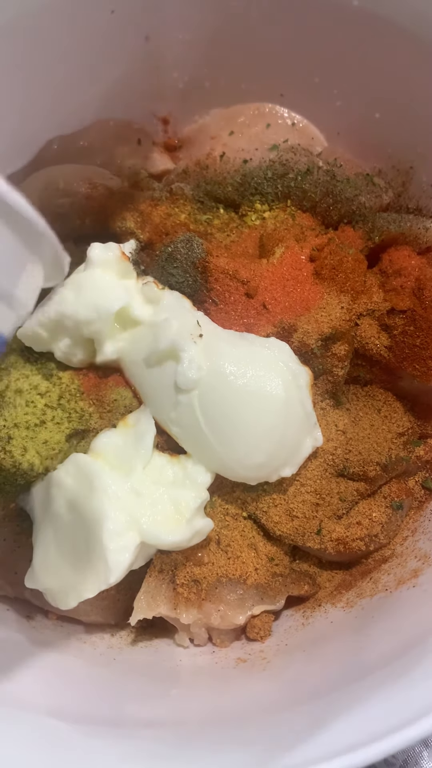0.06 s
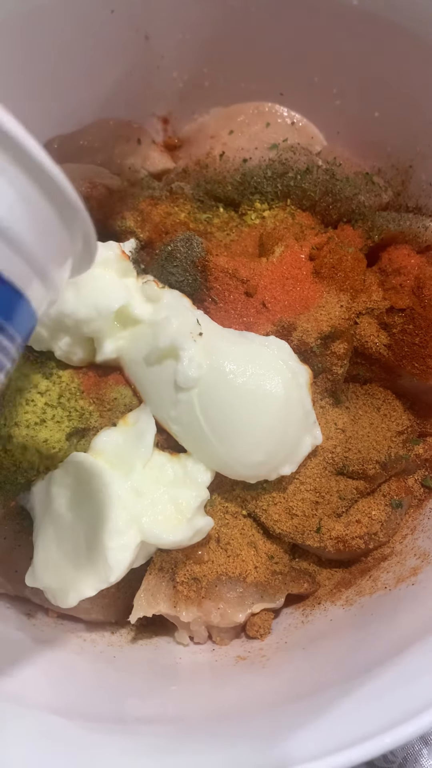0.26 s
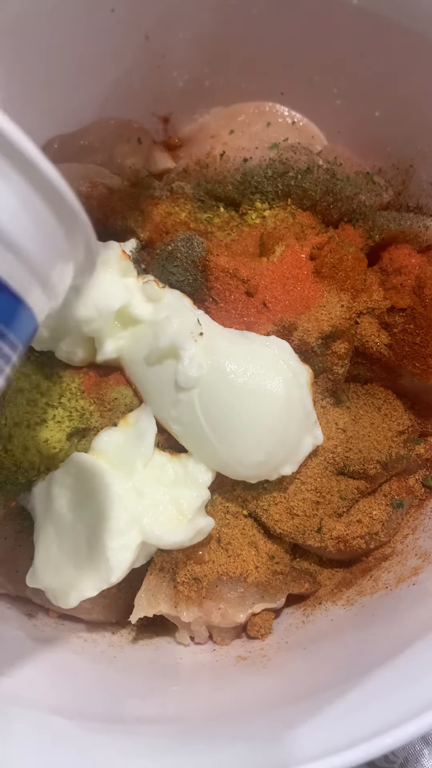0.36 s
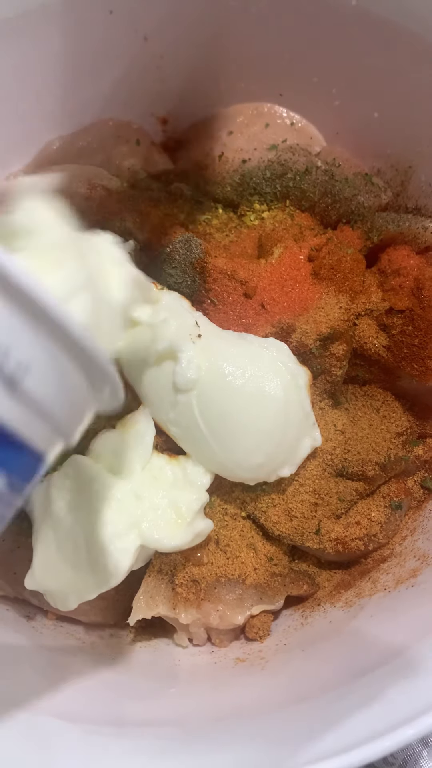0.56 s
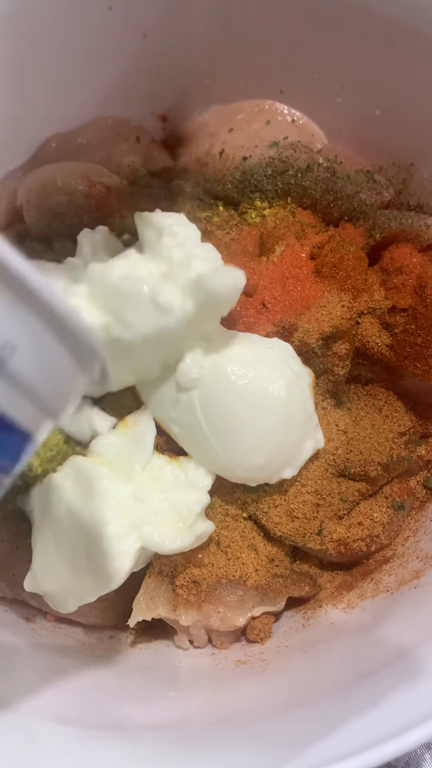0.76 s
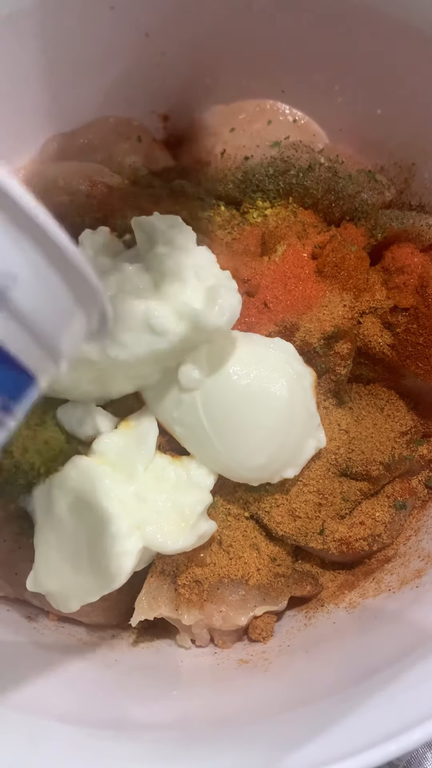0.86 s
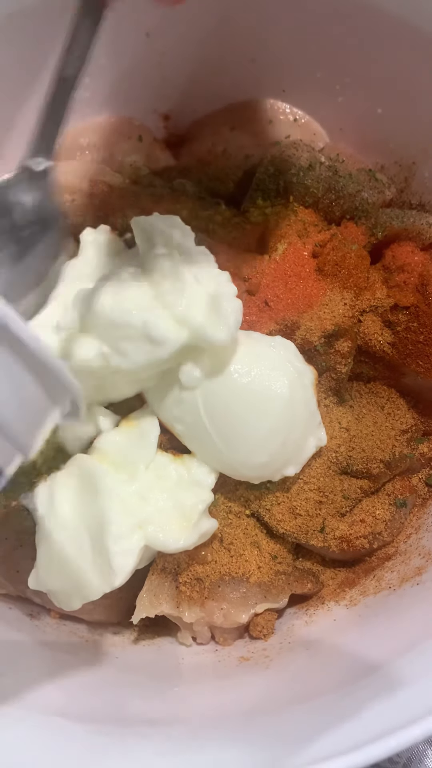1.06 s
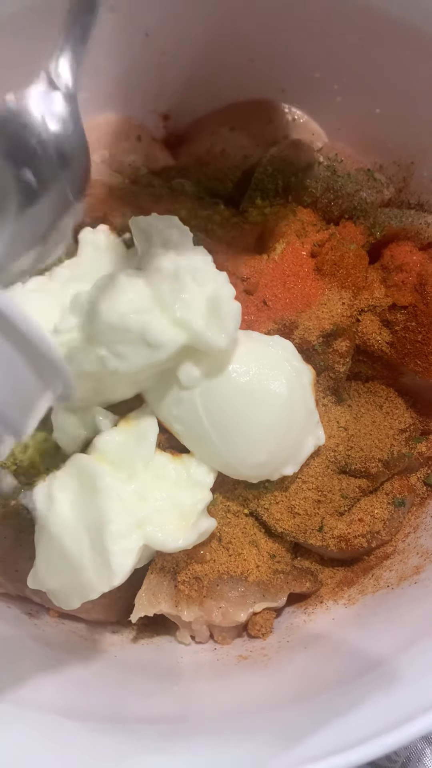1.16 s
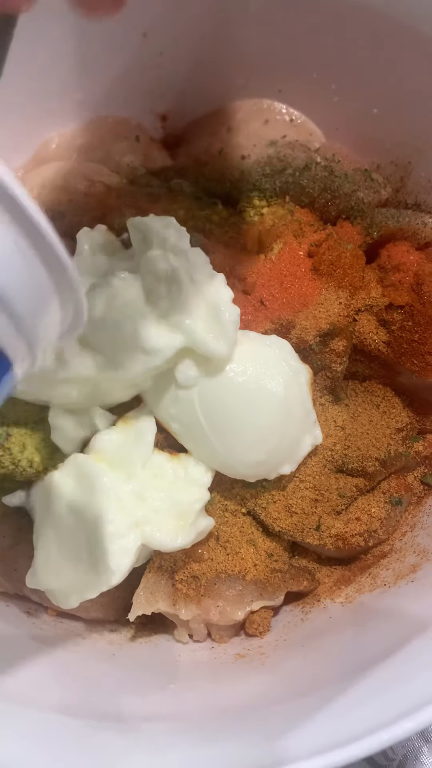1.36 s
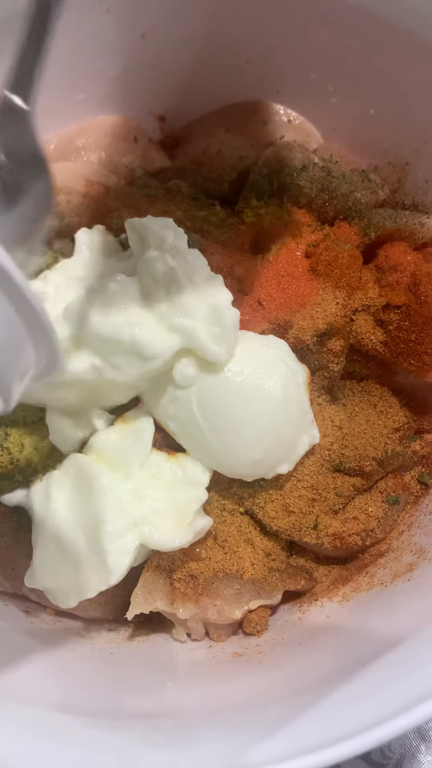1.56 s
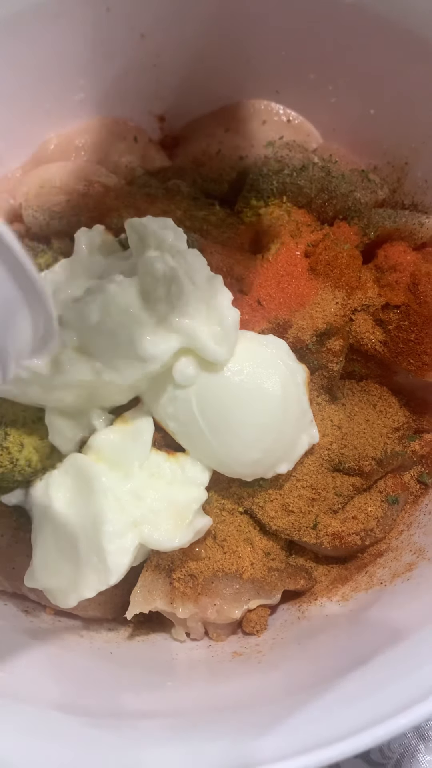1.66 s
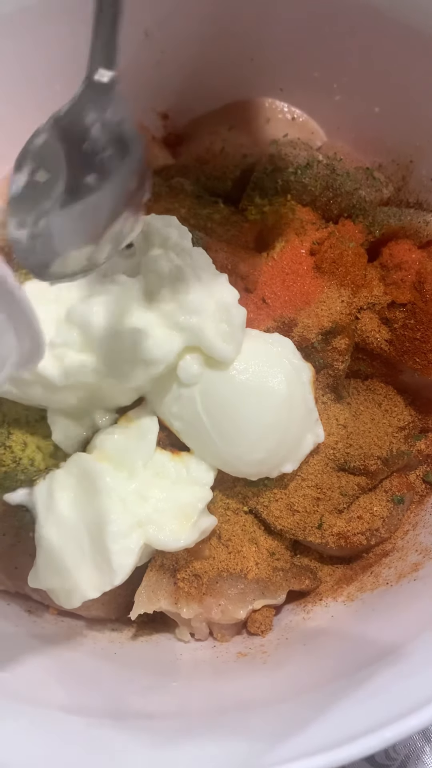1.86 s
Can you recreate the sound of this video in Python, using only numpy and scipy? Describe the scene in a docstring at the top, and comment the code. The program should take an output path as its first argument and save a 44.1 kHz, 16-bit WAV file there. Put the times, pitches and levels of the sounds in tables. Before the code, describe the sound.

Metal spoon knocks sharply on a plastic yogurt tub, with wet smears and short scrapes, close up

```python
"""A metal spoon digs yogurt from a plastic tub and knocks it off over a bowl, close to the microphone.
Each knock is a burst of noise plus fading tones for the tub's wall, its air and its body; some add a low thump.
Between knocks, gritty noise makes the scrapes and smears, and short noise bursts make wet ticks.
A small kitchen answers with a fading noise tail and one echo, over a faint rumble and a thin high whine."""
import sys
import numpy as np
from scipy import signal
from scipy.fft import rfft, irfft
from scipy.io import wavfile

SR = 44100
rng = np.random.default_rng(int(sys.argv[2]) if len(sys.argv) > 2 else 0)


def digitize_waveform(pressure):
    """Quantize a signal to 16-bit integers and store it at the path in sys.argv[1].

    Rows of a 2-D input are taken as channels; values are limited to [-1, 1].
    """
    field = np.atleast_2d(pressure).T
    bounded = np.clip(field, -1, 1)
    quanta = np.round(bounded * 32767).astype(np.int16)
    wavfile.write(sys.argv[1], SR, quanta)


N = 85995  # length in samples

# firm knocks of spoon on tub: start_s, crack_db, wall_db, wall_pitch_hz, hollow_db, body_db, body_pitch_hz,
# clinks (a list of pitch_hz, level_db)
KNOCKS = [(0.226, -26.5, -24, 913, -21, -25, 548, [(1120, -30), (2430, -30.5)]),
          (0.5065, -10.5, -25, 960, -17.5, -11, 506, [(2290, -9.5), (3030, -18), (4040, -14),
          (7640, -9.5)]), (0.8146, -16.5, -25, 963, -40.5, -26, 370, [(2250, -24.5), (3700, -22),
          (5400, -18.5)]), (0.939, -15, -19, 1007, -37, -13.5, 455, [(2050, -27.5), (3670, -13)]),
          (1.2749, -14, -19, 1070, -44, -12, 378, [(3450, -28), (5880, -12), (6900, -18.5)]),
          (1.3540, -14.5, -16, 1274, -25, -14, 797, [(1000, -14.5), (1800, -19), (2220, -23),
          (5150, -10.5)]), (1.6370, -11.5, -11.5, 1049, -20, -9, 396, [(2380, -19.5), (3680, -16.5),
          (5850, -15.5)])]
# light grazes and bounces: start_s, crack_db, wall_db, wall_pitch_hz, hollow_db
BOUNCES = [(.5038, -22, -20, 1008, -55.5), (1.2887, -32, -41.5, 1080, -33),
           (1.3615, -26.5, -23.5, 1000, -47), (1.3743, -24, -19.5, 1063, -39),
           (1.3788, -49, -22.5, 1186, -40), (1.6672, -26.5, -22, 1013, -41.5),
           (1.6750, -23.5, -17, 1151, -24)]
# tones of the tub's wall: multiple_of_wall_pitch, level_db, t60_s (time to fade by 60 dB)
WALL_TONES = [(1, 0.5, 0.027), (1.37, -12, 0.048), (2.05, -7.5, 0.018), (2.35, -12, 0.03),
              (3.6, -13.5, 0.028), (5.8, -17.5, 0.021)]
# tone colour of the cracks: pitch_hz, level_db
CRACK_COLOUR = [(100, -13.5), (400, 3.5), (780, 10), (1100, -2.5), (1700, -5.5), (2400, -2.5), (4000, 1.5),
                (6000, 0.5), (8000, -5.5), (12000, -6), (16000, -21)]
# narrow treble peaks of spoon and tub: pitch_hz
RIDGES_HZ = [1920, 2300, 2950, 3350, 3900, 6050, 6660, 7640]
# the spoon sticks and slips along the wall: start_s, level_db
SLIPS = [(.9655, -12.5), (.9676, -16), (.9695, -15), (.9724, -15.5), (.9777, -13.5)]
# soft low pushes as the tub jolts and yogurt lands: start_s, level_db, final_pitch_hz
THUMPS = [(0.23, -22, 74.8), (0.508, -32, 90.7), (0.817, -20, 60.2), (1.278, -29, 90.4), (1.354, -21, 64.7),
          (1.644, -27.5, 72.1)]
# spoon dragged along the tub: start_s, end_s, start_level_db, end_level_db
SCRAPES = [(0.48, 0.508, -50, -55), (0.734, 0.84, -47.5, -52.5), (0.928, 0.975, -40, -37),
           (0.992, 1.086, -41, -59), (1.075, 1.23, -59.5, -74.5)]
# tone colour of the scrapes: pitch_hz, level_db
SCRAPE_COLOUR = [(40, -28), (190, -9), (450, -10), (720, -11), (950, -2.5), (1080, -10), (1270, -1),
                 (1700, -14), (3200, -20), (3900, -9), (5600, -14.5), (8500, -31.5), (10700, -23.5),
                 (14000, -44.5)]
# wavering ring of spoon and bowl under a scrape: pitch_hz, level_db
SINGING_TONES = [(345, -10), (468, -8), (540, -10), (721, -12), (945, 0), (1135, -6), (1215, -7),
                 (1292, -2), (1389, -13), (3850, -14)]
# yogurt smearing on plastic: start_s, end_s, start_level_db, end_level_db, tilt_db_per_octave
SMEARS = [(0.233, 0.308, -49.5, -52, -4.5), (0.302, 0.379, -45.5, -37, -3), (0.382, 0.432, -39.5, -27.5, 0),
          (0.435, 0.523, -49, -49, 0.5), (0.661, 0.715, -63, -65.5, -7), (0.829, 0.955, -47, -48, 10),
          (0.943, 0.991, -27.5, -36, -3.5), (1.189, 1.243, -56, -56, 2.5), (1.257, 1.358, -51, -50.5, -2),
          (1.937, 1.969, -70, -68, -6)]
# tone colour of the smears before their tilt: pitch_hz, level_db
SMEAR_COLOUR = [(30, -34), (220, -36), (420, -14), (650, -5), (900, -12), (1400, -5), (2000, -3), (3000, 0),
                (5500, 5), (8000, -2), (11000, -5), (15500, -23)]
# tiny wet ticks: start_s, level_db, pitch_hz
TICKS = [(0.559, -35.5, 13600), (1.5611, -49.5, 10100), (1.731, -46.5, 10100)]
# how long the kitchen's tail takes to fade by 60 dB: pitch_hz, t60_s
ROOM_T60 = [(100, 0.2), (300, 0.58), (600, 0.36), (1200, 0.3), (3000, 0.21), (7000, 0.15), (15000, 0.14)]
# loudness of the kitchen's tail: pitch_hz, level_db
ROOM_LEVEL = [(80, -17), (300, -11.5), (650, -14.5), (1200, -16), (3000, -16), (7000, -25.5),
              (15000, -23.5)]
# how much room and rumble differ between the ears: pitch_hz, side_gain
ROOM_WIDTH = [(50, .22), (150, 0.6), (400, 0.85), (1500, 0.91), (8000, 0.38)]
# tone colour of the room's rumble: pitch_hz, level_db
RUMBLE_COLOUR = [(20, -24), (45, -2), (80, 0), (150, -4), (280, -13), (450, -19), (700, -24), (1200, -28),
                 (3000, -31), (8000, -38), (15000, -43)]
# path of the faint high whine: time_s, pitch_hz, level_db
WHINE_PATH = [(0, 15300, -68), (.14, 14100, -68), (.21, 15000, -72), (.6, 15600, -85.5),
              (.87, 14600, -66.5), (1.1, 15800, -71), (1.27, 14300, -65.5), (1.448, 15270, -100)]
# timing between the two microphone ports: pitch_hz, left_lead_radians
PORT_PHASE = [(0, 0), (200, -.2), (700, -.6), (1600, -.45), (2000, .2), (2400, 2.3), (3100, 1.2),
              (4000, 1.9), (4750, 3.2), (6700, 6.2), (8900, 9.4), (11200, 12.6), (13200, 15.7),
              (15000, 18.6), (22000, 18.85)]
# loudness between the two ports: pitch_hz, left_minus_right_db
PORT_BALANCE = [(60, -3.5), (110, 2.5), (200, -5.5), (380, 2), (700, -6.5), (1290, 0), (2380, -1.5),
                (3800, 0), (4750, 3.5), (8120, -1.5), (15000, .5)]

T = np.arange(SR // 4) / SR  # clock for one short sound, s
CLOCK = np.arange(N) / SR  # clock for the whole scene, s
HZ = np.fft.rfftfreq(2 * N, 1 / SR)  # pitches at which filters are drawn

# knocks
CRACK_T60, CRACK_RISE_S = 0.019, 0.00023
RATTLE_DB, RATTLE_T60 = -25.5, 0.2
CLINK_T60 = 0.017
BODY_T60, BODY_RISE_S = 0.027, 0.0023
RIDGE_WIDTH_HZ, RIDGE_DB = 70, 7
HOLLOW_HZ, HOLLOW_T60, HOLLOW_RISE_S = 647, .075, .0022
HOLLOW_PAIR_HZ, HOLLOW_PAIR_DB, HOLLOW_PAIR_T60 = 662, -17, .18
FLUTTER_DEPTH, FLUTTER_HZ = .25, 70
# slips: levels are added to each slip's own level; damping divides the wall's fading times
SLIP_WALL_HZ, SLIP_WALL_DB, SLIP_DAMPING = 1010, 4.5, 3.36
SLIP_CRACK_DB, SLIP_BODY_DB, SLIP_BODY_HZ = -10.5, -11, 587
# thumps: the extra pitch is added at the start and dies away
THUMP_T60, THUMP_RISE_S = 0.083, 0.0084
THUMP_EXTRA_HZ, THUMP_SAG_S = 203, 0.0056
# friction: grains are random spikes, and the fade is the level change over one slip
STROKE_EDGE_S, GRAINS_PER_S, GRAIN_SHARE = 0.017, 900, .2
STICK_HZ, STICK_JITTER, STICK_FADE_DB = 210, .5, -8
SING_DB, SING_T60, SING_WAVER_HZ = -1.5, .52, 12
TICK_T60, TICK_WIDTH_OCT = 0.015, 0.27
# room and background
ROOM_DELAY_S = 0.0048  # middle of the tail's fade-in
ECHO_S, ECHO_DB, ECHO_HZ, ECHO_WIDTH_OCT = 0.059, -23.5, 620, 0.43
RUMBLE_DB, WHINE_WIDTH_HZ = -61, 300
LOW_CUT_HZ, HIGH_CUT_HZ = 22, 16300


def spoon():
    """Knocks, bounces and slips crack and ring the tub; the point of contact sets the pitches."""
    cracks, rings = np.zeros((2, N))
    for s, crack_db, wall_db, wall_hz, hollow_db, *_ in KNOCKS + BOUNCES:
        add(cracks, s, amp(crack_db) * crack())
        add(rings, s, amp(wall_db) * wall(wall_hz) + amp(hollow_db) * hollow())
    for s, *_, body_db, body_hz, clinks in KNOCKS:
        add(rings, s, amp(body_db) * ring(body_hz, BODY_T60, BODY_RISE_S))
        for hz, db in clinks:
            add(rings, s, amp(db) * ring(hz, CLINK_T60, CRACK_RISE_S))
    for s, db in SLIPS:
        add(cracks, s, amp(db + SLIP_CRACK_DB) * crack())
        add(rings, s, amp(db + SLIP_WALL_DB) * wall(SLIP_WALL_HZ, SLIP_DAMPING))
        add(rings, s, amp(db + SLIP_BODY_DB) * ring(SLIP_BODY_HZ, BODY_T60, BODY_RISE_S))
    return rings + colour(cracks, read(CRACK_COLOUR, HZ) + ridges())


def crack():
    """A few milliseconds of crowded high tones, made from noise, then a weak rattle."""
    noise = unit(np.tanh(2 * rng.standard_normal(len(T))))
    rattle = amp(RATTLE_DB) * dying(RATTLE_T60, CRACK_RISE_S)
    return noise * (dying(CRACK_T60, CRACK_RISE_S) + rattle)


def wall(hz, damping=1):
    """The plastic wall bends in several ways at once, each a fading tone."""
    return sum(amp(db) * ring(hz * ratio, t60 / damping, CRACK_RISE_S) for ratio, db, t60 in WALL_TONES)


def hollow():
    """Air in the tub: two close tones that beat and flutter as they die."""
    first = ring(HOLLOW_HZ, HOLLOW_T60, HOLLOW_RISE_S)
    second = amp(HOLLOW_PAIR_DB) * ring(HOLLOW_PAIR_HZ, HOLLOW_PAIR_T60, HOLLOW_RISE_S)
    flutter = slow_noise(FLUTTER_HZ)[:len(T)]
    return (first + second) * (1 + FLUTTER_DEPTH * flutter)


def ridges():
    """Narrow treble peaks of spoon and tub, as dB over HZ."""
    return RIDGE_DB * sum(1 / (1 + ((HZ - hz) / RIDGE_WIDTH_HZ) ** 2) for hz in RIDGES_HZ)


def thumps():
    """Low pushes whose pitch sags as they die."""
    out = np.zeros(N)
    for s, db, final_hz in THUMPS:
        pitch = final_hz + THUMP_EXTRA_HZ * np.exp(-T / THUMP_SAG_S)
        add(out, s, amp(db) * dying(THUMP_T60, THUMP_RISE_S) * glide(pitch))
    return out


def friction():
    """Bright smears of yogurt, and hollow scrapes that leave spoon and bowl ringing."""
    smears = np.zeros(N)
    for *row, tilt in SMEARS:
        curve = read(SMEAR_COLOUR, HZ) + ridges() + tilt * np.log2(HZ + 20)
        smears += colour(stroke(*row), curve)
    drag = sum(stroke(*row) for row in SCRAPES)
    return smears + colour(drag, read(SCRAPE_COLOUR, HZ)) + singing(drag)


def stroke(start, end, from_db, to_db):
    """The spoon sticks and lets go unevenly; each slip is a fading spray of grains and hiss."""
    grains = unit(rng.standard_normal(N) * (rng.random(N) < GRAINS_PER_S / SR))
    hiss = rng.standard_normal(N)
    spray = np.sqrt(GRAIN_SHARE) * grains + np.sqrt(1 - GRAIN_SHARE) * hiss
    slip_rate = STICK_HZ * np.exp(STICK_JITTER * slow_noise(STICK_HZ))
    since_slip = np.cumsum(slip_rate) / SR % 1  # 0 to 1 within each slip
    gate = np.clip(np.minimum(CLOCK - start, end - CLOCK) / STROKE_EDGE_S + .5, 0, 1)
    level = amp(np.interp(CLOCK, [start, end], [from_db, to_db]))
    return unit(spray * amp(STICK_FADE_DB * since_slip)) * gate * level


def singing(drag):
    """The scrape drives long tones of spoon and bowl, each beating unevenly as it dies."""
    tones = np.zeros(N)
    for hz, db in SINGING_TONES:
        tones += amp(db) * np.sin(2 * np.pi * hz * CLOCK) * (1 + slow_noise(SING_WAVER_HZ))
    tones *= np.exp(-np.log(1000) * CLOCK / SING_T60)
    return amp(SING_DB) * signal.fftconvolve(drag, tones / np.linalg.norm(tones))[:N]


def ticks():
    """Small air pockets snap in the yogurt: short noise bursts around one pitch."""
    out = np.zeros(N)
    for s, db, hz in TICKS:
        snap = rng.standard_normal(len(T)) * dying(TICK_T60, CRACK_RISE_S)
        octaves_away = np.log2((HZ + 1) / hz)
        band = -10 * np.log10(1 + (octaves_away / TICK_WIDTH_OCT) ** 4)
        add(out, s, amp(db) * colour(snap, band))
    return out


def echo(x):
    """One dull, late reflection."""
    out = np.zeros(N)
    octaves_away = np.log2((HZ + 1) / ECHO_HZ)
    add(out, ECHO_S, amp(ECHO_DB) * shaped(x, np.exp(-(octaves_away / ECHO_WIDTH_OCT) ** 2)))
    return out


def kitchen(x):
    """Many blurred reflections, made from noise, each pitch band dying at its own speed."""
    hz, t, noise = signal.stft(rng.standard_normal(SR), SR, nperseg=256)
    t60 = read(ROOM_T60, hz)[:, None]
    fade = np.exp(-np.log(1000) * t / t60)
    even_energy = np.sqrt(2 * np.log(1000) / (t60 * SR))  # so a longer fade adds no energy
    shape = amp(read(ROOM_LEVEL, hz))[:, None] * fade * even_energy
    tail = signal.istft(noise * shape, SR, nperseg=256)[1]
    fade_in = np.clip(np.arange(len(tail)) / SR / ROOM_DELAY_S - .5, 0, 1)
    return signal.fftconvolve(x, tail * fade_in)[:N]


def rumble():
    """The room's steady, low background noise."""
    return amp(RUMBLE_DB) * colour(rng.standard_normal(N), read(RUMBLE_COLOUR, HZ))


def whine():
    """A thin, fuzzy line at the top of hearing: slow noise carried up by a wandering tone."""
    s, hz, db = np.transpose(WHINE_PATH)
    fuzz = unit(colour(rng.standard_normal(N), -20 * np.log10(1 + (HZ / WHINE_WIDTH_HZ) ** 2)))
    return amp(np.interp(CLOCK, s, db)) * fuzz * glide(np.interp(CLOCK, s, hz))


def ports(x):
    """Two microphone ports hear the sound with different phase and level."""
    phase = np.interp(HZ, *np.transpose(PORT_PHASE))
    left = np.exp(.5j * phase) * amp(read(PORT_BALANCE, HZ) / 2)  # each port takes half the difference
    return irfft(rfft(x, 2 * N) * np.array([left, 1 / left]))[:, :N]


def dying(t60, rise_s):
    """Quick rise, then a smooth fade."""
    return (1 - np.exp(-T / rise_s)) * np.exp(-np.log(1000) * T / t60)


def ring(hz, t60, rise_s):
    """One fading tone, as from a struck object."""
    return dying(t60, rise_s) * np.sin(2 * np.pi * hz * T)


def glide(hz):
    """A tone that follows a changing pitch."""
    return np.sin(2 * np.pi * np.cumsum(hz) / SR)


def slow_noise(hz):
    """Random wandering of rms 1, mostly slower than hz."""
    return unit(shaped(rng.standard_normal(N), np.exp(-(HZ / hz) ** 2)))


def colour(x, curve_db):
    """Filters with a dB curve over HZ, scaled to unit power gain, without sounding ahead of time."""
    log_gain = np.log(unit(amp(curve_db)) + 1e-6)
    mirrored = np.concatenate([log_gain, log_gain[-2:0:-1]])
    response = np.exp(signal.hilbert(mirrored).conj())[:N + 1]  # the phase follows from the gain
    return irfft(rfft(x, 2 * N) * response)[:N]


def shaped(x, gain):
    """Multiplies each pitch by a gain over HZ."""
    return irfft(rfft(x, 2 * N) * gain)[:N]


def read(points, hz):
    """Reads a table between its points, on a log pitch scale."""
    f, value = np.transpose(points)
    return np.interp(np.log(hz + 1), np.log(f + 1), value)


def add(mix, s, sound):
    """Mixes a sound in at time s, cut off at the end of the mix."""
    part = mix[max(round(s * SR), 0):][:len(sound)]
    part += sound[:len(part)]


def amp(db):
    """Decibels to gain."""
    return 10 ** (np.asarray(db) / 20)


def unit(x):
    """Scales to rms 1."""
    return x / np.sqrt(np.mean(x ** 2) + 1e-20)


def scene():
    """Spoon, tub and yogurt in the kitchen, over its rumble and the whine."""
    near = spoon() - thumps() + ticks() + friction()  # thumps push the opposite way
    front = kitchen(near) + rumble()
    apart = kitchen(near) + rumble()  # new random draws, opposite in left and right
    sides = shaped(apart, read(ROOM_WIDTH, HZ)) * np.array([[1], [-1]])
    return ports(near + echo(near) + front + whine()) + sides


def record(dry):
    """The recorder's low cut and treble limit."""
    low_cut = signal.butter(2, LOW_CUT_HZ, "high", fs=SR, output="sos")
    high_cut = signal.firwin(255, HIGH_CUT_HZ, window=("kaiser", 9), fs=SR)
    return signal.oaconvolve(signal.sosfilt(low_cut, dry), high_cut[None], "same")


dry = scene()
out = record(dry)
digitize_waveform(out)
```